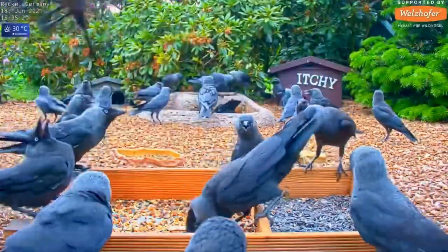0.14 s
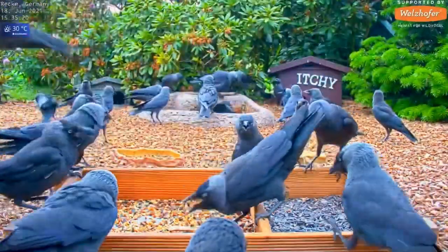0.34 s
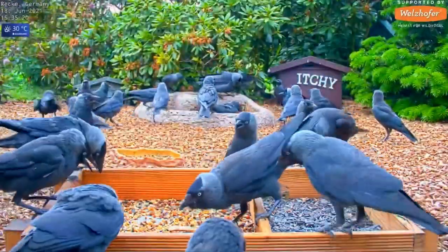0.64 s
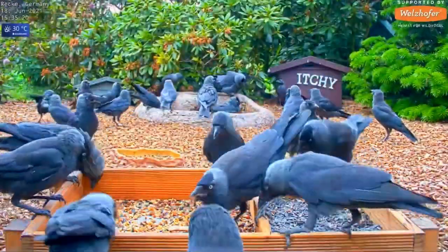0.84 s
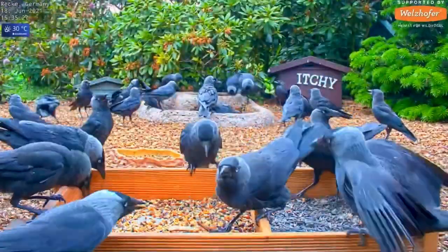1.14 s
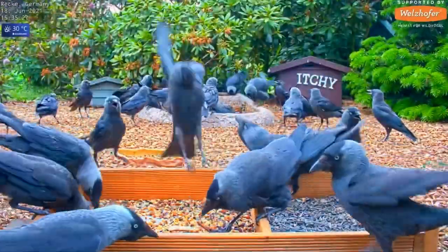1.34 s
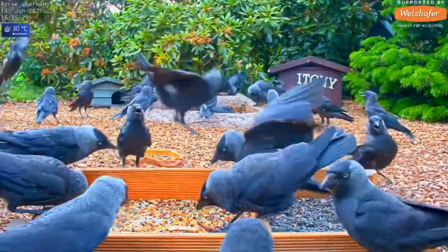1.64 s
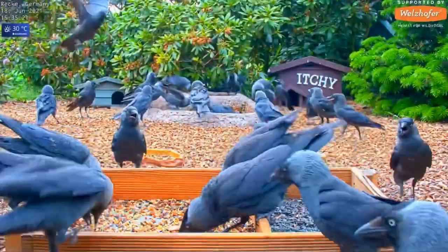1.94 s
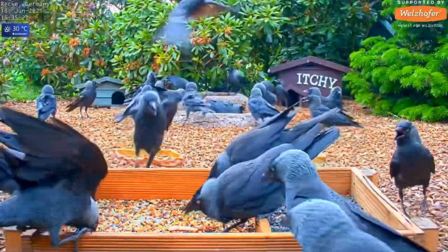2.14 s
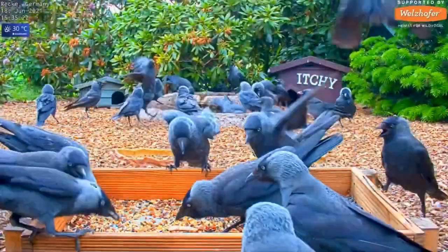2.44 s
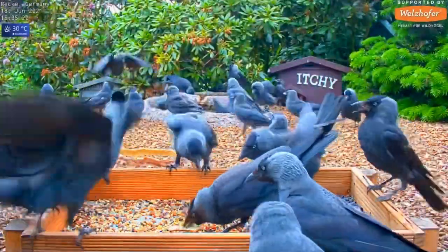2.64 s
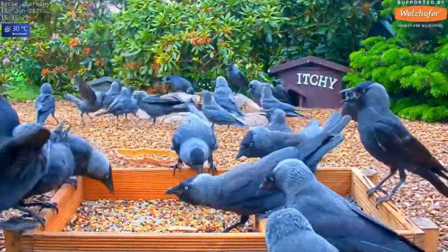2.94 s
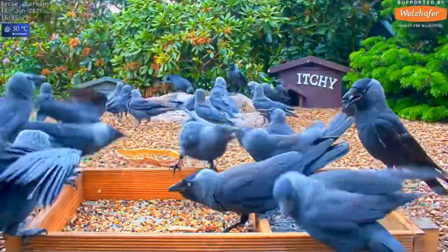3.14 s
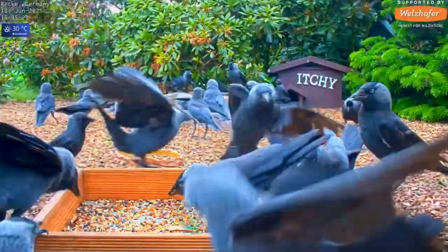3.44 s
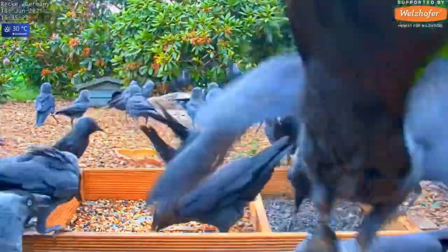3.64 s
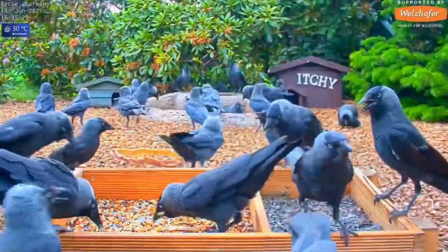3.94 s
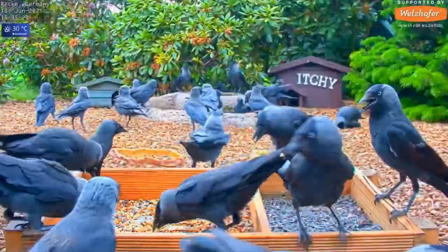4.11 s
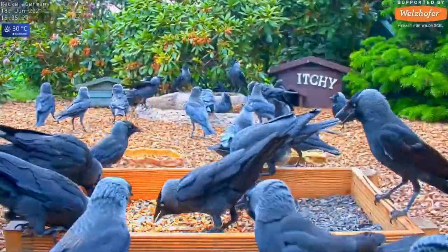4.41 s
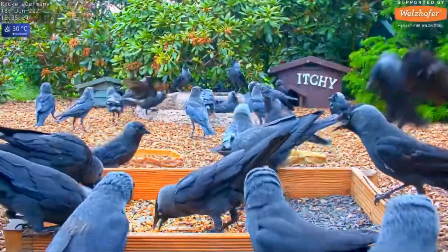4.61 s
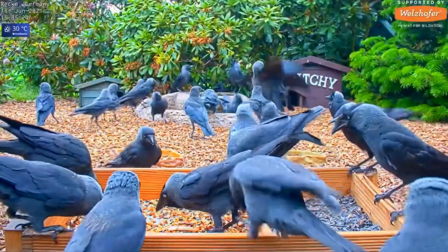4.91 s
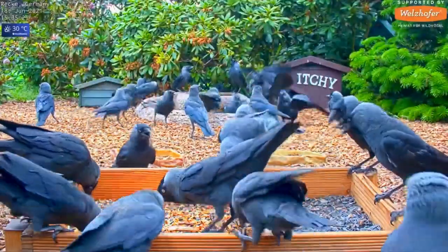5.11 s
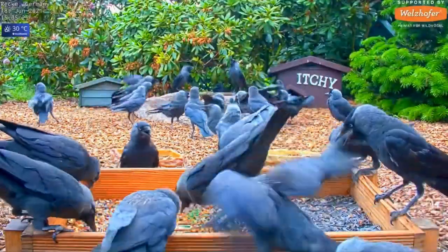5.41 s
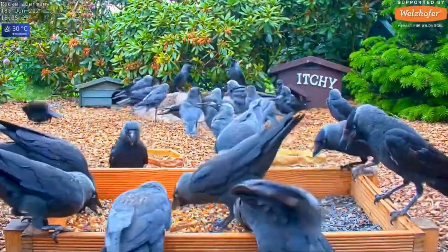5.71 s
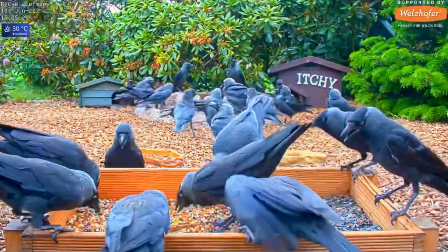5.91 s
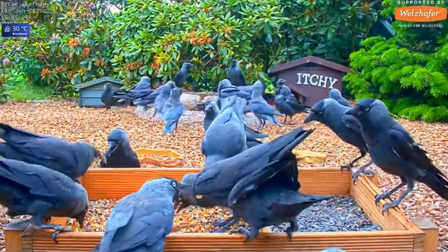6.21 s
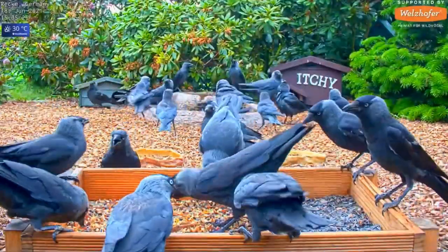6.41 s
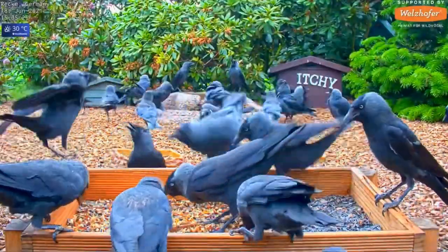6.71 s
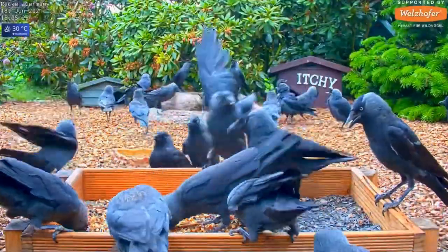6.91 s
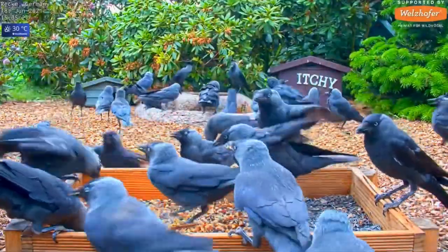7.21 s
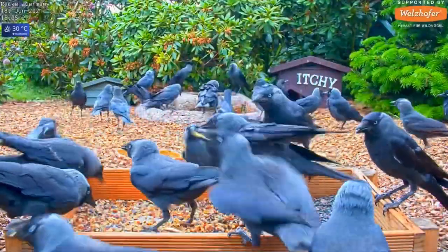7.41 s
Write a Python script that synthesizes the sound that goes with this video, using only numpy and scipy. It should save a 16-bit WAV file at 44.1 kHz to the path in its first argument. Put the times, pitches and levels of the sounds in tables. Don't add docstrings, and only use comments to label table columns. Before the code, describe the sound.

Sharp, clipped crow calls bark out close by, densest around three to four and a half seconds, over seed ticking, wooden knocks and rustle.

```python
import sys
import numpy as np
from scipy import signal
from scipy.io import wavfile
from scipy.ndimage import uniform_filter1d

SR = 44100
rng = np.random.default_rng(int(sys.argv[2]) if len(sys.argv) > 2 else 0)


def elevation(decibels):
    levels = np.asarray(decibels, float)
    return 10 ** (levels / 20)


def to_wav(s):
    ch = np.atleast_2d(s).T
    pcm = np.round(np.clip(ch, -1, 1) * 32767)
    wavfile.write(sys.argv[1], SR, pcm.astype(np.int16))


N = 332955
T = np.arange(N) / SR


def band(x, hz, width):
    hz, width = min(hz, SR / 2.5), min(width, SR / 3)
    return signal.lfilter(*signal.iirpeak(hz, hz / width, fs=SR), x)


def unit(x):
    return x / np.sqrt(np.mean(x ** 2))


def walk(rate, size=N):
    k = max(int(SR / rate), 17)
    levels = rng.standard_normal(size // 16)[:size // k + 1]
    held = np.repeat(levels, k)
    return 1.39 * uniform_filter1d(uniform_filter1d(held, k), k)[:size]


def read(rows):
    s, *columns = np.transpose(rows)
    i = int(s[0] * SR)
    t = T[i:i + int((s[-1] - s[0]) * SR)]
    return i, [np.interp(t, s, c) for c in columns]


def add(out, i, x):
    x = x[:max(N - i, 0)]
    out[i:i + len(x)] += x


# start t/s, length t/s, first pitch f/Hz, last pitch f/Hz, level/dB
CALLS_MADE = [(0.092, 0.049, 1060, 617, -5.5), (0.137, 0.045, 970, 755, -32), (0.771, 0.031, 965, 680, -7),
              (1.066, 0.053, 1025, 645, -4.5), (1.355, 0.077, 1085, 837, -13.5),
              (3.0145, 0.054, 1232, 747, -3.5), (3.178, 0.031, 960, 848, -18),
              (3.184, 0.064, 1075, 642, -3), (3.304, 0.045, 1137, 775, -19), (3.338, 0.052, 958, 652, -9.5),
              (3.416, 0.04, 977, 633, -15.5), (3.4402, .078, 1435, 670, 3.5), (3.474, .043, 1202, 960, -21),
              (3.551, 0.088, 1154, 668, -10.5), (3.998, 0.075, 1353, 698, -0.5),
              (4.268, 0.057, 1051, 800, -30), (4.327, 0.099, 1336, 857, -14), (4.46, 0.037, 1270, 802, -7),
              (5.046, 0.065, 1092, 864, -23)]
# sag of the pitch [1 even, more = late], loudest at [share 0-1],
# 1st, 3rd and upper partials level/dB against the 2nd
POSTURE = [(1.764, 0.51, -1, -5, -11), (0.96, 0.26, 9, -1, -32), (1, 0.37, -12.5, -4.5, -21.5),
           (2.7, 0.59, -4, -17, -21.5), (0.74, 0.42, 8, 2, -7), (1.73, 0.47, -1.5, 8.5, -20),
           (1.6, 0.95, 5.5, 3, -20), (1.69, 0.67, -9, -7.5, -21.5), (0.88, 0.49, 0.5, 1.5, -13.5),
           (0.95, 0.22, 0.5, -6.5, -6), (0.49, 0.3, -3.5, -21, -41), (.75, 0.34, -5.5, -23, -16),
           (4.4, 0.43, 9, -15, -25), (2, 0.05, -1.5, -1.5, -8), (1.05, 0.25, -1.5, -15.5, -11),
           (1.82, 0.36, 13, 15, 6.5), (1.13, 0.33, -8, -15, -17), (1.1, 0.15, -14.5, -6.5, -29),
           (0.73, 0.32, 3.5, 7, -3)]
# swell from onset to loudest level/dB, voice breaks at [share 0-1]
DELIVERY = [(20.5, 0.51), (13, 0.9), (10.5, 0.78), (5, 0.61), (29.5, 0.34), (8.5, 0.47), (2.5, 0.5),
            (5.5, 0.64), (-1, 1), (19.5, 0.6), (-8.5, 0.97), (1.5, 0.32), (-17, 1), (2, 0.86), (5.5, 0.47),
            (17, 0.7), (2, 0.4), (-26.5, 0.7), (4, 1)]
# resonance f/Hz, its lift level/dB, muffled above f/Hz,
# late growth of the 1st partial level/dB
GAPE = [(4420, -2, 5800, -2.5), (5000, 6, 6000, -4), (3500, -2, 4300, 4), (5900, 3, 9500, -4.5),
        (5600, 0, 8300, -13), (5130, 8, 8600, -2.5), (5000, 1.5, 8000, 0), (5900, 1, 11000, -3),
        (4300, 5, 11000, 6.5), (5540, -13, 5600, -2.5), (4500, -5.5, 5850, -8), (5590, 10, 7700, -5.5),
        (5000, 9.5, 7000, -4), (4600, 5.5, 8400, -0.5), (5540, 3, 9600, -6), (7200, 11, 10700, -1),
        (7600, 3, 9100, -10), (6760, 2, 9800, 22), (5300, 14.5, 10000, -4)]
# extra drop of the overtones level/dB, extra hoarseness level/dB,
# late growth of the 3rd partial level/dB
CRACK = [(1.5, 3, 21.5), (0, -4, 2), (10.5, -8, 26.5), (-3.5, -3, -4), (3, 6, -17), (9.5, 6, 9),
         (-5, 2, 11), (3, 6, 2.5), (0, -1, 7), (-4, -1, 13), (-2, -6.5, 0), (-1, 7.5, 15), (-4, 4, 2),
         (-1, 7, -1.5), (5, 6.5, 11), (-13, -1, 0), (1.5, -2, 6), (9, 3, 16.5), (2, 11.5, 7)]
# line between 2nd and 3rd partial, level/dB against the 2nd
HALF_DB = [-6, -20, -17, -11, -2.5, -7.5, -17, -8.5, -18, -11, -11, -6, -21.5, -4, -12, -12, -16, 7, -14]
HOARSE_DB, TAIL_HOARSE_DB = -32, -7
WOBBLE, ONSET_S = 0.0089, 0.0025


def calls():
    out, drift, shake = np.zeros(N), walk(250), walk(1100)
    shake = shake - uniform_filter1d(shake, SR // 150)
    settings = zip(CALLS_MADE, POSTURE, DELIVERY, GAPE, CRACK, HALF_DB)
    for (s, *call), posture, delivery, gape, crack, half_db in settings:
        *beak, low_growth_db = gape
        crack_db, rough_db, third_growth_db = crack
        i = int(s * SR)
        hz, db, late = breath(*call, *posture, *delivery, crack_db)
        size = len(hz)
        span = slice(i, i + size)
        hz = uniform_filter1d(hz, SR // 120, mode="nearest")
        phase = 2 * np.pi * np.cumsum(hz * (1 + WOBBLE * drift[span])) / SR
        patchy = np.array([walk(102.0, size=SR // 7)[:size] for _ in range(10)])
        growth = np.linspace(-.5, 1, size)
        db[0] = db[0] + low_growth_db * growth
        db[2] = db[2] + third_growth_db * growth
        voice = sum(elevation(db[k] + 2.4 * patchy[k]) * np.cos((k + 1) * phase + 0.29 * k) for k in range(3))
        voice += elevation(db[3] - 6.0) * upper_partials(hz, phase, late, shake[span], patchy[3:], *beak)
        voice += elevation(db[1] + half_db) * late * np.cos(5 * phase / 2)
        hoarse_db = rough_db + HOARSE_DB + (TAIL_HOARSE_DB - HOARSE_DB) * late
        hoarse = elevation(hoarse_db) * shake[span]
        opening = np.clip(T[:size] / ONSET_S, 0, 1) ** 2
        add(out, i, np.sqrt(2) * voice * (1 + hoarse) * opening * opening[::-1])
    return out


# f/Hz, level/dB
WINDPIPE = [(600, 1), (900, -5), (1300, -1), (1650, -4), (2000, 5), (2500, -4), (3200, 1.5), (3900, -14.5)]
FADE_DB = [
    13.4,
    20,
    32.4,
    30.4,
]
FADE_POWER = 1.5
BREAK_DB, BREAK_S = 6, 0.0042
BRIGHT_SWELL, BROKEN_ROUGH = 1.6, .45


def breath(length, first_hz, last_hz, level_db, sag, loudest, low_db, third_db, upper_db,
           swell_db, breaks, crack_db):
    done = np.linspace(0, 1, int(length * SR))
    hz = first_hz + (last_hz - first_hz) * done ** sag
    loudest = np.clip(loudest, .03, .9)
    swell = swell_db * np.clip(1 - done / loudest, 0, 1) ** 2
    broken = (1 + np.tanh((done - breaks) * length / BREAK_S)) / 2
    fade = np.clip((done - loudest) / (1 - loudest), 0, 1) ** FADE_POWER
    balance = (low_db, 0, third_db, upper_db)
    db = [level_db + g - swell - BREAK_DB * broken - f * fade for g, f in zip(balance, FADE_DB)]
    db = db[:1] + [d - crack_db * broken for d in db[1:]]
    for k in range(3):
        db[k] = db[k] + np.interp((k + 1) * hz, *np.transpose(WINDPIPE))
    db[3] = db[3] - (BRIGHT_SWELL - 1) * swell
    return hz, db, np.maximum(done ** 3, BROKEN_ROUGH * broken)


# f/Hz, level/dB
BEAK = [(2500, 19), (3500, 5), (4200, -1), (5500, 0.5), (7300, -4.5), (9500, -10), (14000, 7)]
GAPE_WIDTH_HZ, MUFFLE_DB_PER_KHZ = 490, 10


def upper_partials(hz, phase, late, shake, patchy, gape_hz, lift_db, dull_hz):
    upper = np.arange(4, 15)[:, None]
    partial_hz = upper * hz
    lift = lift_db * np.exp(-((partial_hz - gape_hz) / GAPE_WIDTH_HZ) ** 2)
    gape_db = lift - MUFFLE_DB_PER_KHZ * np.maximum(partial_hz - dull_hz, 0) / 1e3
    colour_db = np.interp(partial_hz, *np.transpose(BEAK))
    tops = elevation(colour_db + gape_db + 4.9 * np.resize(patchy, gape_db.shape))
    start = 2 * np.pi * np.resize(rng.random(7), upper.shape)
    blur = start + 0.3 * upper * (late + .1) * shake[::-1]
    return np.sum(tops * np.cos(upper * phase + blur), axis=0)


# t/s, pulse rate f/Hz, level/dB
CROAK = [
    (4.4602, 651, -23),
    (4.466, 613.7, -16),
    (4.495, 421, -17.5),
    (4.52, 344, -20.5),
    (4.541, 298, -26),
    (4.556, 286, -36),
]
# f/Hz, width f/Hz, level/dB
THROAT = [(416, 75, -10), (920, 390, -2.5), (2370, 400, 4), (2760, 310, 4), (5270, 710, -14),
          (6900, 740, -7.5), (10080, 900, -15)]
RASP_DB, RASP_FADE_DB_S = -14, 280


def croak():
    out = np.zeros(N)
    i, (hz, db) = read(CROAK)
    size = len(hz)
    rasp_db = RASP_DB - RASP_FADE_DB_S * T[:size]
    cycles = np.cumsum(hz * (1 + 0.028 * walk(300)[:size])) / SR
    pulses = np.diff(np.floor(cycles), prepend=0) * elevation(2.7 * walk(350)[:size])
    ring = sum(elevation(g) * band(band(pulses, f, w), f, 2 * w) for f, w, g in THROAT)
    air = band(band(rng.standard_normal(SR // 5), 6220, 2500), 6220, 2500)
    air = band(air, 5700, 4000)[:size]
    puffs = air * np.exp(-(cycles % 1) / 0.49)
    add(out, i, elevation(db) * unit(ring) + elevation(rasp_db) * unit(puffs))
    return out


# t/s, peak level/dB, ring f/Hz, broad crunch level/dB against the ring
PECKS = [(0.2135, -22.5, 1310, 5), (0.844, -25, 2310, -13), (.925, -21.5, 2780, 8), (0.977, -19.5, 1820, 2),
         (1.641, -23, 1980, -14), (1.801, -22, 9170, 1.5), (2.127, -22, 1870, -7),
         (2.2747, -26.5, 4300, 13.5), (2.405, -22.5, 2150, -30), (2.5128, -19, 2500, -37.5),
         (2.666, -17, 1360, 12), (2.8442, -17.5, 2280, -23), (2.932, -22.5, 8000, -14.5),
         (3.104, -20, 1345, 8), (3.944, -20, 1400, -1), (4.58, -26, 1560, -1), (4.6696, -15, 1540, 2.5),
         (5.232, -20, 5600, 27.5), (5.643, -23, 1254, 0), (5.9421, -18, 1720, 14), (6.093, -20, 1420, -17),
         (6.333, -30, 1200, -25), (6.514, -26, 11000, -24.5), (6.823, -25.5, 1400, 13.5),
         (7.218, -14.5, 2550, 9), (7.3552, -23.5, 4730, 1.5)]
# t/s, peak level/dB, ring f/Hz,
# broad swish level/dB against the ring, time to fall 60 dB t/s
SLAPS = [(0.376, -30, 7260, -18.5, 0.062), (0.5955, -15.5, 7440, 4.5, 0.043),
         (1.9533, -27, 1423, 1.5, 0.071), (2.563, -25, 6220, 19, 0.067), (2.717, -20.5, 1810, 6.5, 0.1),
         (2.8637, -17.5, 6330, 13, 0.069), (4.76, -25, 6100, 12, 0.055), (5.47, -21.5, 1524, 4, 0.092),
         (5.49, -17, 8040, 13, 0.046), (6.661, -30, 8600, 2, 0.042), (7.0582, -25, 7750, 1.5, 0.11),
         (7.275, -24, 8300, -9.5, 0.045)]
# t/s, peak level/dB, ring f/Hz
SNAPS = [(0.1594, -19.5, 10300), (0.2789, -9, 8770), (0.3327, -20, 8460), (0.752, -22.5, 10640),
         (1.0543, -12.5, 8000), (1.219, -19, 10700), (1.253, -12, 8000), (1.5713, -15, 8970),
         (1.7, -27.5, 6710), (1.7714, -18, 8410), (1.8497, -18.5, 8490), (1.9, -23.5, 3640),
         (2.0963, -17, 3840), (2.109, -16, 3670), (2.2726, -14, 4200), (2.356, -16, 9700),
         (2.794, -22.5, 9070), (2.8443, -7, 6100), (2.8943, -11.5, 11550), (4.082, -12, 3530),
         (4.205, -16, 6900), (4.243, -20, 3110), (5.3676, -20, 3950), (5.461, -25, 3700),
         (5.8468, -6.5, 6600), (5.997, -28.5, 3660), (6.2984, -21, 10600), (7.1656, -38, 6180),
         (7.1836, -21.5, 9800), (7.432, -21.5, 5300)]
PECK_T60_S, SNAP_T60_S, SNAP_CRUNCH_DB = 0.03, .009, 6


def ticks():
    out, t = np.zeros(N), T[:SR // 10]
    rows = [(*r, PECK_T60_S) for r in PECKS] + SLAPS
    rows += [(s, db - 7.0, hz, SNAP_CRUNCH_DB, SNAP_T60_S) for s, db, hz in SNAPS]
    chance = rng.standard_normal((len(rows), len(t)))
    grit = elevation(2.5 * walk(900))
    for (s, db, hz, crunch_db, t60), noise in zip(rows, chance):
        ring = unit(band(band(noise, hz, 0.45 * hz), hz, 3.2 * hz))
        crunch = elevation(crunch_db) * band(noise, 4000, 11300)
        rise = 1 - np.exp(-t / (6.3 * t60 ** 2))
        shape = rise * elevation(-60 * t / np.clip(t60, .004, .2))
        shape = shape + 0.11 * np.exp(-t / 0.00082)
        tick = (ring + crunch) * shape * grit[:len(t)]
        add(out, int((s - .001) * SR), elevation(db + 3.0) * tick / np.abs(tick).max())
    return out


# t/s, peak level/dB, pitch f/Hz
KNOCKS = [(0.21, -21, 352), (0.705, -29.5, 258), (0.982, -21.5, 232), (1.986, -33, 230), (2.126, -31, 334),
          (2.341, -27.5, 266), (2.41, -22, 326), (2.554, -23.5, 385), (2.859, -21.5, 440),
          (2.965, -28.5, 279), (3.096, -35, 318), (3.865, -21, 347), (3.949, -25, 257), (4.221, -28, 640),
          (4.669, -23, 313), (5.139, -27.5, 326), (5.293, -25.5, 269), (5.632, -31, 227), (6.135, -24, 318),
          (6.2, -28, 224), (6.335, -22.5, 324), (6.732, -32, 268), (7.129, -27, 233), (7.219, -10.5, 349),
          (0.32, -28, 685), (0.606, -34.5, 504), (0.85, -28.5, 666), (0.959, -30, 500), (1.189, -34, 543),
        (1.737, -34, 635), (1.802, -36, 640), (1.884, -37, 620), (1.959, -29, 720), (2.434, -31, 645),
        (2.721, -27, 694), (2.918, -26, 750), (4.411, -27, 920), (4.576, -32.5, 650), (5.034, -31.5, 960),
        (5.383, -27.5, 850), (5.573, -32.5, 616), (5.878, -29.5, 475), (5.907, -29.5, 720),
        (7.509, -36.5, 650)]
# ratio to the pitch [1], time to fall 60 dB t/s, level/dB
BOARD = [(1.003, 0.038, 7.5), (1.35, 0.08, -9.5), (2.2, 0.0086, 6.5), (3, 0.028, -9.5)]


def knocks():
    out, t = np.zeros(N), T[:SR // 8]
    rows = KNOCKS
    chance = rng.standard_normal((len(rows), len(t)))
    for (s, db, hz), scuff in zip(rows, chance):
        faster = max(hz / 330, 1)
        ring = sum(elevation(g - 60 * t / t60 * faster) * np.sin(2 * np.pi * hz * r * t) for r, t60, g in BOARD)
        blow = (1 + 30 * scuff) * (1 - np.exp(-t / 0.0022)) * np.exp(-t / 0.0086)
        thud = band(signal.fftconvolve(ring, blow)[:len(t)], 2.33 * hz, 6.1 * hz)
        add(out, int((s - .002) * SR), elevation(db + 1.5) * thud / np.abs(thud).max())
    return signal.lfilter(*signal.butter(2, 135, "high", fs=SR), out)


# t/s, peak level/dB, ring f/Hz
PIPS = [(0.851, -32, 4010), (0.9582, -33, 1834), (1.0345, -39.5, 2040), (1.4344, -22, 5700),
        (1.6493, -18, 2500), (1.7044, -41, 4790), (2.371, -18, 3880), (2.6143, -24.5, 3360),
        (5.2944, -21.5, 1850), (5.3902, -25.5, 3410), (5.5694, -22.5, 2200), (5.6391, -21, 3500),
        (5.695, -22, 3200), (5.7078, -27.5, 3180), (5.7234, -25, 7300), (5.7758, -45, 4800),
        (5.877, -22, 4400), (5.9075, -22, 2220), (5.9963, -33, 3680), (6.1315, -23.5, 4360),
        (6.145, -22, 2290), (6.1742, -29, 3540), (6.2244, -33, 6480), (6.3078, -28, 3430),
        (6.3648, -27, 3270), (6.4637, -38, 4700), (6.4784, -25, 4120), (6.5534, -21.5, 4010),
        (6.5753, -22, 1826), (6.5874, -27, 2500), (6.6734, -21.5, 6380), (6.7346, -38, 3370),
        (3.296, -16, 11760), (3.4092, -22.5, 9400), (4.331, -13.5, 7800), (4.3335, -15.5, 7800),
         (4.347, -14, 7500), (4.99, -40, 8940), (5.1332, -28.5, 12200), (5.366, -20.5, 10250),
         (5.464, -21.5, 8400), (5.49, -23, 7800), (5.5044, -35, 10300), (.958, -23, 8200),
         (0.92, -22, 10600), (1.1745, -23, 8100), (6.8103, -25, 6680), (2.7457, -18, 6400),
         (.7605, -26, 8200), (.29, -22.5, 5100)]
PIP_T60_S, PIP_WIDTH = 0.061, 0.093
PIP_DB, PIP_CRUNCH_DB = -7, 1.5


def pips():
    out, t = np.zeros(N), T[:SR // 20]
    rows = PIPS
    chance = rng.standard_normal((len(rows), len(t)))
    for (s, db, hz), noise in zip(rows, chance):
        width = PIP_WIDTH * hz
        ring = unit(band(band(noise, hz, width), hz, 3 * width))
        crunch = elevation(PIP_CRUNCH_DB) * band(noise, 5000, 9000)
        pip = (ring + crunch) * (1 - np.exp(-t / 0.00058)) * elevation(-60 * t / PIP_T60_S)
        add(out, int((s - .001) * SR), elevation(db + PIP_DB) * pip / np.abs(pip).max())
    return out


# t/s, level/dB
BUSTLE = [(0.0, -42), (.23, -30.5), (.44, -46.5), (1.11, -44), (2.06, -45.5), (2.63, -40), (2.92, -34),
          (3.26, -40.5), (3.43, -38), (3.66, -38), (4.08, -43), (4.44, -45.5), (4.8, -52), (5.23, -40),
          (5.7, -46), (6.1, -40), (6.6, -44), (7.19, -42.5)]
# t/s, level/dB
RUSTLE = [(0.0, -40.5), (0.23, -36.5), (0.38, -43), (1.7, -41), (2.35, -42), (2.69, -42.5), (2.92, -36.5),
          (3.26, -35), (3.43, -30), (3.59, -34.5), (4.27, -42.5), (4.46, -40.5), (4.86, -44), (5.47, -43),
          (5.82, -45), (6.75, -45), (7.17, -38.5), (7.55, -42.5)]
# f/Hz, level/dB per Hz
GARDEN = [(30, -67), (270, 9.5), (481, -8), (771, 2.5), (1600, -18), (1880, -8), (8570, -10.5),
          (15600, -15.5)]
SHUFFLE_DB, RUSTLE_DB = -2.5, 0.5
WOOD_TOP_HZ = 1500


def bustle():
    _, (busy_db,) = read(BUSTLE + [(N / SR + 1, *BUSTLE[-1][1:])])
    _, (rustle_db,) = read(RUSTLE + [(N / SR + 1, *RUSTLE[-1][1:])])
    wood, seed, stir, wide = 0, 0, walk(25), grains()
    colour_hz, colour_db = np.transpose(GARDEN)
    for hz in 40 * 2 ** np.arange(0, 8.9, .5):
        db = np.interp(np.log(hz), np.log(colour_hz), colour_db)
        grit = 1 + 0.93 * wide + 0.92 * grains()
        flicker_db = 1.5 * stir + 1.9 * walk(25)
        noise = elevation(db + flicker_db) * band(rng.standard_normal(N) * grit, hz, hz / 3)
        share = 1 / (1 + (hz / WOOD_TOP_HZ) ** 2)
        wood = wood + share * noise
        seed = seed + (1 - share) * noise
    return elevation(busy_db + SHUFFLE_DB) * unit(wood) + elevation(rustle_db + RUSTLE_DB) * unit(seed)


GRAINS_PER_S, GRAIN_DB = 160, 0.5


def grains():
    kicks, count = np.full(N, 1e-9), int(GRAINS_PER_S * N / SR)
    when, size = rng.random((N // 100, 2))[:count].T
    kicks[(when * N).astype(int)] = elevation(np.minimum(-GRAIN_DB * np.log(1 - size), 14))
    return unit(signal.lfilter([1], [1, -np.exp(-1 / (0.0027 * SR))], kicks))


# start t/s, end t/s, first f/Hz, last f/Hz, level/dB
SQUAWKS = [(6.055, 6.165, 2700, 2800, -44), (6.07, 6.16, 4750, 4400, -43), (.785, .835, 4400, 3200, -41),
           (1.97, 2.04, 3700, 3400, -42), (2.3, 2.42, 4600, 3300, -47.5), (1.5, 1.59, 3300, 3000, -49),
           (.63, .69, 3600, 2600, -48), (7.44, 7.54, 4300, 2900, -46), (6.42, 6.49, 5300, 3500, -57),
           (6.65, 6.7, 2900, 1600, -57), (5.5, 5.54, 3900, 3500, -45), (5.33, 5.41, 990, 615, -42)]
SQUAWK_SPREAD_HZ = 450


def squawks():
    out, rough = np.zeros(N), unit(walk(SQUAWK_SPREAD_HZ * 2))
    for s, end, first_hz, last_hz, db in SQUAWKS:
        size = int((end - s) * SR)
        phase = 2 * np.pi * np.cumsum(np.linspace(first_hz, last_hz, size)) / SR
        add(out, int(s * SR), elevation(db + 3.5) * signal.windows.tukey(size, .6) * np.sin(phase))
    return out * rough


# start t/s, end
# t/s, first f/Hz, last f/Hz, level/dB
WHISTLES = [(.41, 0.465, 5540, 5200, -55), (0.634, 0.668, 2560, 2420, -51), (1.448, 1.474, 2050, 2250, -45),
            (1.464, 1.5, 2230, 1950, -47.5), (1.483, 1.537, 2200, 1500, -52.5),
            (2.228, 2.27, 4400, 4300, -49), (2.704, 2.783, 5500, 5900, -49), (.462, .492, 5900, 5600, -56),
            (6.933, 6.98, 5000, 4700, -58), (1.86, 1.923, 2560, 2300, -54), (1.896, 1.948, 3750, 3400, -48),
            (1.963, 2.007, 5850, 8500, -49), (2, 2.1, 5450, 5330, -67), (2.917, 3.095, 8730, 7600, -42),
            (3.422, 3.438, 2250, 2000, -17.5), (4.638, 4.765, 3620, 3300, -52.5),
            (4.777, 4.9, 3230, 3400, -54.5), (5.13, 5.2, 5850, 5300, -56), (0.836, .915, 4000, 3800, -57),
            (.93, 0.977, 4100, 3100, -53), (.628, .652, 5150, 4600, -51), (.828, .855, 6000, 5900, -53),
            (.858, 0.893, 6000, 5150, -57), (1.505, 1.555, 2500, 2050, -48),
            (1.543, 1.584, 2600, 2400, -50), (1.813, 1.843, 3850, 3550, -49),
            (1.96, 1.996, 3900, 4500, -50), (.127, 0.14, 5600, 5100, -41), (0.11, 0.166, 730, 545, -37.5),
            (3.483, 3.513, 400, 1100, -26.5), (3.076, 3.135, 270, 360, -42),
            (5.437, 5.468, 100, 307, -46.5), (4.47, 4.497, 950, 950, -23), (4.39, 4.445, 970, 580, -43.5),
            (7.077, 7.15, 5150, 3600, -51)]
STEADY_BELOW_HZ = 1500


def whistles():
    out, flutter = np.zeros(N), elevation(2.2 * walk(230) - 1)
    for s, end, first_hz, last_hz, db in WHISTLES + chatter():
        i, size = int(s * SR), int((end - s) * SR)
        tremble = 1 + 0.012 * np.sin(2 * np.pi * 40 * T[:size])
        hz = np.linspace(first_hz, last_hz, size) * tremble
        level = elevation(db + 9.5) * signal.windows.tukey(size, .45)
        if first_hz > STEADY_BELOW_HZ and end < N / SR:
            level = level * flutter[i:][:size]
        add(out, i, level * np.sin(2 * np.pi * np.cumsum(hz) / SR))
    return out


CHATTER_COUNT, CHATTER_DB = 60, -66


def chatter():
    s, length, pitch, glide, loud = rng.random((CHATTER_COUNT, 5)).T
    start = s * N / SR
    end = start + 0.03 + 0.05 * length
    hz = 2300 * 2 ** (1.4 * pitch)
    return list(zip(start, end, hz, hz * (0.86 + 0.17 * glide), CHATTER_DB + 6 * loud))


BOUNCE_S, BOUNCE_DB = .0055, -12
NEARBY_DB, NEARBY_T60_S = -21.5, 0.059


def scene():
    voices = calls() + croak()
    echo = elevation(BOUNCE_DB) * np.roll(voices, int(BOUNCE_S * SR))
    near = voices + echo + ticks() + knocks()
    t = T[:SR // 10]
    scatter = rng.standard_normal(len(t)) * elevation(-60 * t / NEARBY_T60_S) * (t > .002)
    wet = signal.fftconvolve(near, scatter / np.linalg.norm(scatter))[:N]
    return (near + elevation(NEARBY_DB) * wet + whistles() + bustle() + squawks() + pips())[None]


def roll_off(x):
    return signal.sosfilt(signal.butter(12, 15790, fs=SR, output="sos"), x)


CEILING, FULL_SCALE = 1.16, .985


def record(dry):
    x = np.clip(dry, -CEILING, CEILING)
    x = signal.sosfilt(signal.butter(2, 28, "high", fs=SR, output="sos"), x)
    x = signal.sosfilt(signal.ellip(10, .2, 70, 15790, fs=SR, output="sos"), x)
    return roll_off(np.clip(x, -FULL_SCALE, FULL_SCALE))


dry = scene()
out = record(dry)
to_wav(out)
```